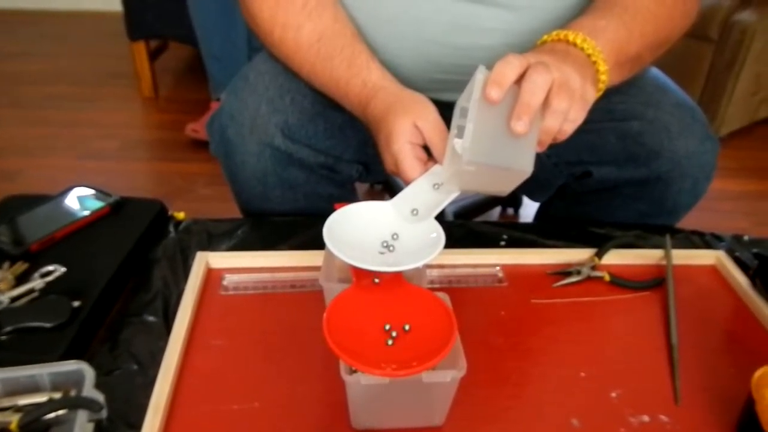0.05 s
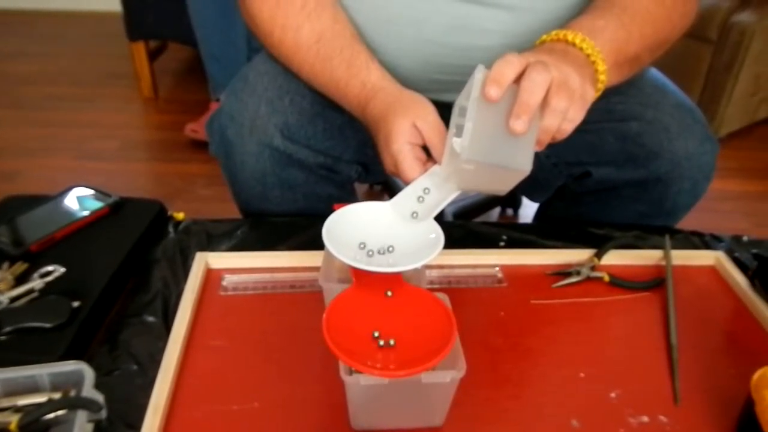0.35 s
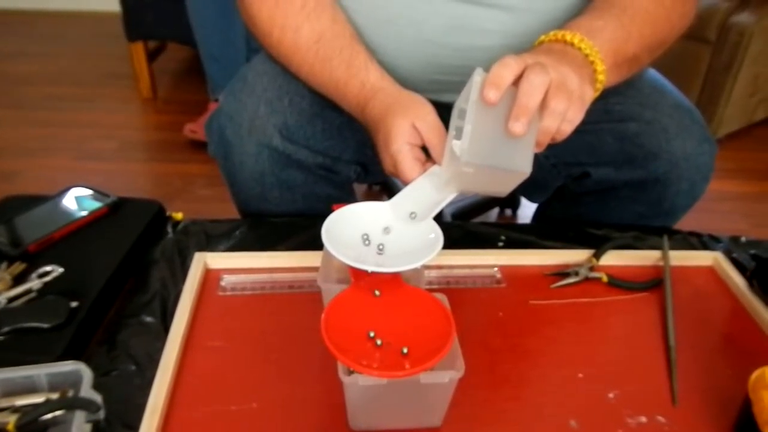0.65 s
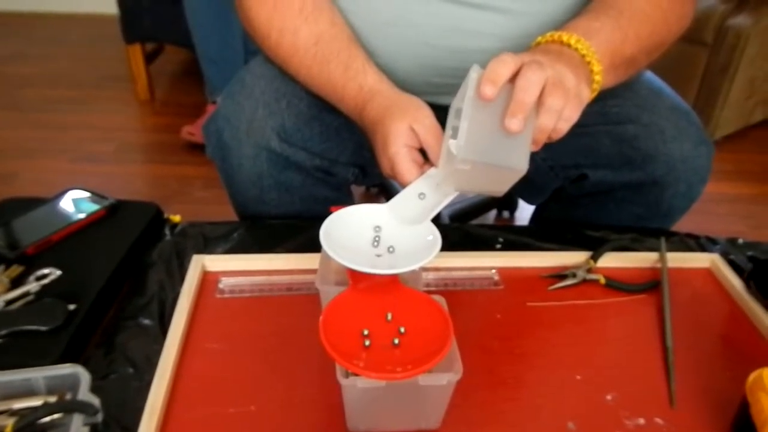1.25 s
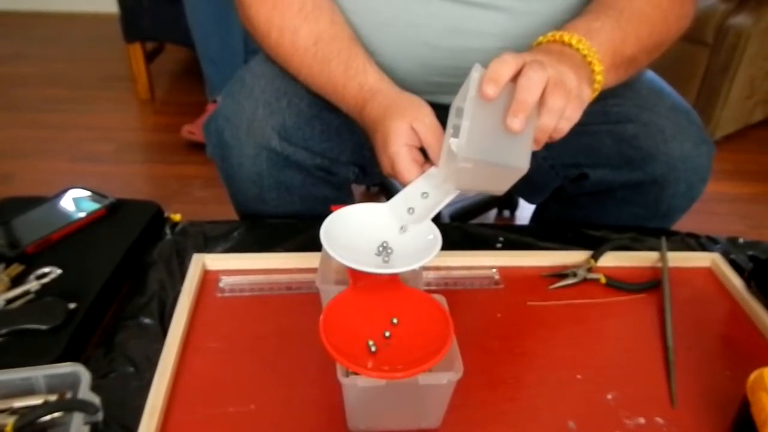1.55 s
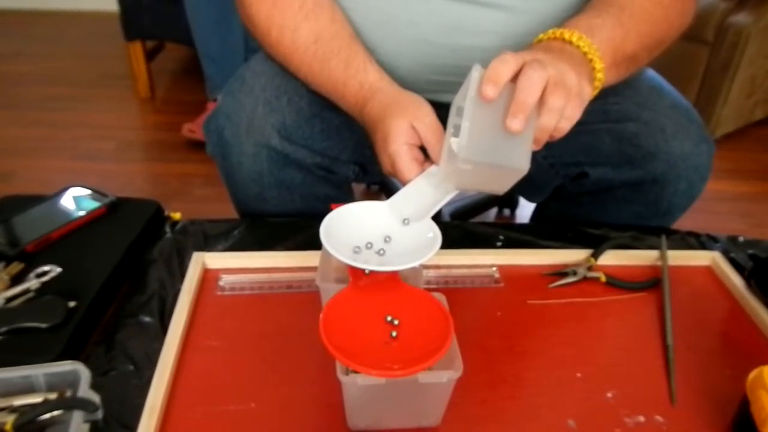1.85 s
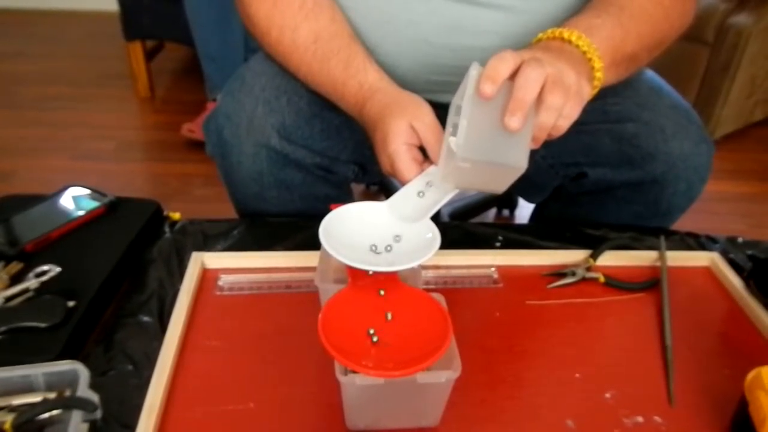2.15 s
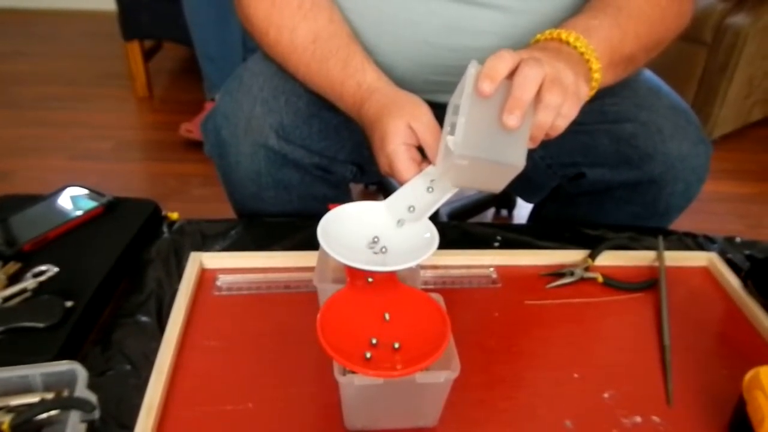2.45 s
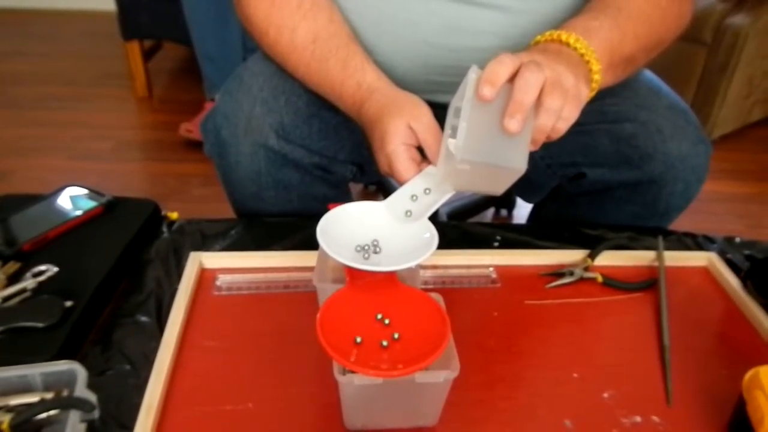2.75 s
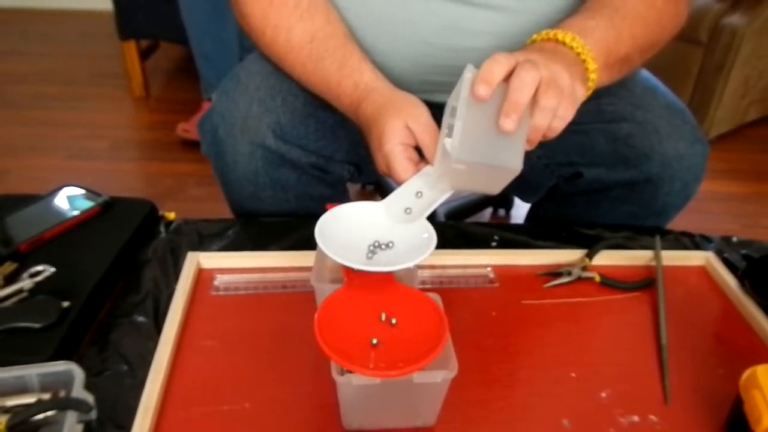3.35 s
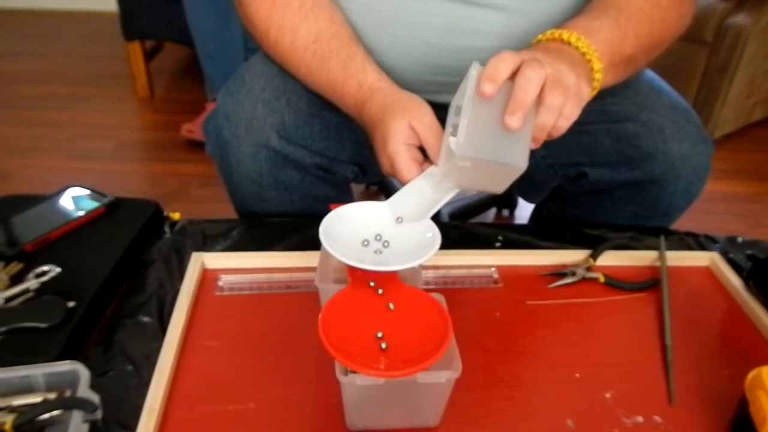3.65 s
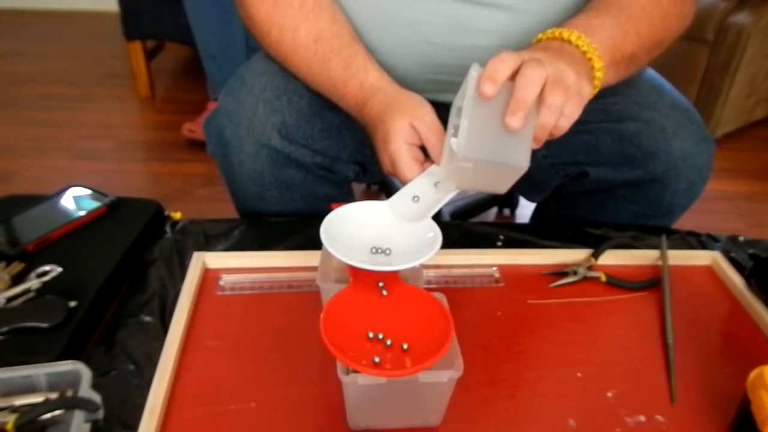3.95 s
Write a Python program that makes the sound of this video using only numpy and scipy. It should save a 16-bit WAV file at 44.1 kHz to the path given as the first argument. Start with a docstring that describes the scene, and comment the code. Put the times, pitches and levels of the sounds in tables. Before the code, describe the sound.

Small steel balls drop into plastic dishes for the whole four seconds, making quick, uneven knocks and rattles mixed with sharp metal clicks and light hops. Soft rolling and a faint chute hiss run underneath. The clatter thins briefly around 1 second and picks up at 1.3. From about 2.5 to 2.8 seconds a ball circles a rim with a short hum. It sounds close, in a quiet room.

```python
"""Small steel balls drop into a plastic spoon rest and on into a second one, each dish lying on a box.
Every landing knocks the dish, which slaps and chatters on its box. The balls click against each other,
hop lightly, rumble in the hollow and make the dish hum as they circle its rim. Behind this, balls hiss
down a plastic chute. A near stereo microphone hears it all in a quiet living room."""
import sys
import numpy as np
from scipy import signal
from scipy.fft import rfft, irfft, next_fast_len
from scipy.io import wavfile
from scipy.ndimage import map_coordinates

SR = 44100
rng = np.random.default_rng(int(sys.argv[2]) if len(sys.argv) > 2 else 0)


def output_pcm(signal):
    """Save a mono or channel-first signal as 16-bit PCM at the path in sys.argv[1].

    Samples are clipped to [-1, 1] before scaling.
    """
    pcm = np.clip(np.atleast_2d(signal).T, -1, 1) * 32767
    wavfile.write(sys.argv[1], SR, np.round(pcm).astype(np.int16))


N = 176400
SIZE = 16384  # samples in one short sound
T = np.arange(SIZE) / SR
HZ = np.fft.rfftfreq(SIZE, 1 / SR)

# the tone of a ball rolling or skidding in a dish: f/Hz, level/dB
RUMBLE_TONE = [(150, -55), (350, -21.5), (600, -5), (850, 6), (1100, -3.5), (1600, -6.5), (1950, -11.5),
               (2240, -6.5), (2650, -13), (3600, -12.5), (6000, -20.5), (8000, -26), (13000, -24),
               (16000, -70)]


def amp(db):
    """Turn decibels into a gain."""
    return 10 ** (np.asarray(db) / 20)


def unit(x):
    """Scale a signal to an average power of 1."""
    return x / np.sqrt(np.mean(x ** 2) + 1e-20)


def along(points, hz):
    """Read between the rows of a (frequency, value) table, on a log frequency axis."""
    f, v = np.transpose(points)
    return np.interp(np.log(hz + 1), np.log(f + 1), v)


def wobble(per_s):
    """A smooth random curve through per_s points a second."""
    points = rng.standard_normal(int(N * per_s / SR) + 4)
    return map_coordinates(points, [np.arange(N) * per_s / SR])


def filtered(x, response):
    """Scale each frequency of x by response(hz)."""
    m = next_fast_len(N + SR // 2)
    return irfft(rfft(x, m) * response(np.fft.rfftfreq(m, 1 / SR)), m)[..., :N]


def low_cut(hz, edge_hz):
    """A filter that weakens everything below edge_hz."""
    return (1j * hz / (1j * hz + edge_hz)) ** 2


def causal(db):
    """A filter with these gains that never sounds before it is struck (minimum phase)."""
    cepstrum = irfft(np.log(amp(db)))
    cepstrum[1:SIZE // 2] *= 2
    cepstrum[SIZE // 2 + 1:] = 0
    return np.exp(rfft(cepstrum))


def add(track, start_s, x):
    """Mix a short sound into the track."""
    i = max(round(start_s * SR), 0)
    n = min(SIZE, N - i)
    track[:, i:i + n] += x[:, :n]


def ring(modes, detune, vary_db=2):
    """Tones that fade by 60 dB in t60 seconds, struck a little differently each time."""
    out = np.zeros(SIZE)
    for hz, db, t60 in modes:
        fade = amp(db + vary_db * rng.normal() - 60 * T / t60)
        out += fade * np.sin(2 * np.pi * hz * (1 + detune * rng.normal()) * T)
    return out


def scatter(db, t60):
    """A dying spray of tiny contacts or nearby echoes, with total energy db."""
    spray = rng.standard_normal((2, SIZE)) * amp(-60 * T / t60)
    return amp(db) * spray / np.linalg.norm(spray[0])


def patter(per_s, spread_db, size=N):
    """Tiny contacts at random moments, a few much stronger than the rest."""
    strength = amp(spread_db * np.clip(rng.standard_normal(size), -2, 2))
    return unit((rng.random(size) < per_s / SR) * strength * rng.choice([-1, 1], (2, size)))


def touch():
    """One sharp push in the stereo middle, with a brief spray after it."""
    return scatter(db=-2.5, t60=0.022) + [T == 0, np.zeros(SIZE)]


def blow(body, contacts, level_db, treble_db, treble_hz=4340):
    """Each contact sets the body sounding; harder blows have more treble."""
    x = irfft(rfft(body) * rfft(contacts))
    x /= np.sqrt(np.mean(x[0, :int(.006 * SR)] ** 2))  # the first 6 ms set the level
    hardness = causal(treble_db / (1 + (treble_hz / (HZ + 1)) ** 4))
    return amp(level_db) * irfft(rfft(x) * hardness)


def rolling(levels, response, bumps_per_s, bump_db, flutter_db):
    """Rolling balls rumble and rattle over tiny bumps, which ring the plastic."""
    drive = rng.standard_normal((2, N)) + amp(bump_db) * patter(bumps_per_s, spread_db=3)
    sound = signal.fftconvolve(drive, irfft(response)[None], axes=1)[:, :N]
    level_db = np.interp(np.arange(N) / SR, *np.transpose(levels))
    return unit(sound) * amp(level_db + flutter_db * wobble(per_s=35))


def spread(pair):
    """Turn a middle and a side signal into left and right, most alike near 1 kHz."""
    # how alike left and right are: f/Hz, likeness (1 = the same)
    likeness = [(60, 0.32), (300, 0.72), (1000, 1), (3000, 0.92), (5000, 0.77), (8000, 0.21), (15000, 0.17)]
    angle = lambda hz: np.arccos(np.clip(along(likeness, hz), -1, 1)) / 2
    mid, side = filtered(pair, lambda hz: np.array([np.cos(angle(hz)), np.sin(angle(hz))]))
    return np.array([mid + side, mid - side])


def room_noise():
    """The steady, low hush of the living room."""
    # the tone of the hush: f/Hz, level/dB
    tone = [(25, -9), (60, 18), (95, 9), (122, 26.5), (150, 14.5), (192, 23), (260, 14.5), (500, 16.5),
            (1500, 2), (5000, -40), (15000, -43)]
    return unit(filtered(rng.standard_normal((2, N)), lambda hz: amp(along(tone, hz))))


def room_echo(x):
    """A short wash of echoes, drawn afresh for each stretch of sound because the balls move about."""
    # how long the echo takes to fade by 60 dB: f/Hz, t60/s
    fade_times = [(200, 0.51), (900, 0.4), (3500, 0.44), (11000, 0.25)]
    out = np.zeros((2, N))
    for i in range(0, N, SIZE // 2):
        hz, t, noise = signal.stft(rng.standard_normal((2, SIZE)), SR, nperseg=256)
        fade = amp(-60 * t / along(fade_times, hz)[:, None])
        tail = signal.istft(noise * fade, SR, nperseg=256)[1][:, :SIZE]
        tail *= 1 - np.exp(-T / 0.0022)  # the echoes take a moment to build
        tail /= np.linalg.norm(tail[0])
        echo = signal.fftconvolve(x[None, i:i + SIZE // 2], tail, axes=1)[:, :N - i]
        out[:, i:i + echo.shape[1]] += echo
    return out


def chute_roll():
    """Balls hiss as they run down the plastic chute."""
    # how the hiss swells and fades: t/s, level/dB
    levels = [(0, -51), (.42, -50.5), (.68, -52), (.84, -69), (1.02, -62), (1.17, -44.5), (1.25, -61),
              (1.4, -64), (2.05, -50), (2.8, -46), (2.96, -53), (3.11, -52.5), (3.3, -51), (3.7, -53),
              (4, -58)]
    # the tone of the hiss: f/Hz, level/dB
    tone = [(200, -22), (800, -11), (1500, -1), (2500, -3.5), (3500, 3), (4500, -8.5), (6000, -15.5),
            (8000, -19.5), (11500, -15.5), (16000, -21)]
    return rolling(levels, causal(along(tone, HZ)), bumps_per_s=200, bump_db=1, flutter_db=7)


def dish_roll():
    """Balls rumble about in the hollow of the dishes."""
    # how the rumble swells and fades: t/s, level/dB
    levels = [(0, -34.5), (.09, -51.5), (.42, -38.5), (.68, -65), (.76, -43.5), (.95, -50), (1.04, -58.5),
              (1.27, -71.5), (1.38, -45.5), (2.4, -51), (2.66, -42), (2.82, -60), (3.14, -69.5),
              (3.22, -41), (3.6, -40.5), (3.7, -53), (4, -73)]
    return rolling(levels, causal(along(RUMBLE_TONE, HZ)), bumps_per_s=310, bump_db=5.5, flutter_db=6.5)


def rim_roll(hum_hz=904, width_hz=250):
    """A ball circles the rim and makes the dish hum."""
    # how the hum swells and fades: t/s, level/dB
    levels = [(2.515, -90), (2.525, -30.5), (2.6, -38.5), (2.69, -36), (2.87, -94)]
    resonance = 1j * HZ * width_hz / (hum_hz ** 2 - HZ ** 2 + 1j * HZ * width_hz)
    return rolling(levels, resonance ** 2, bumps_per_s=160, bump_db=-1, flutter_db=3)


def hops():
    """A ball hops on the plastic with a light tap."""
    # each hop: t/s, level/dB
    hits = [(.4586, -32), (1.156, -46), (1.168, -41), (1.1945, -42.5), (1.2941, -39), (1.5185, -35),
            (1.576, -41), (1.718, -36), (1.8524, -29.5), (2.182, -38), (2.226, -32.5), (2.7202, -32),
            (3.0378, -45), (3.4852, -35), (3.5822, -32), (3.6098, -34.5), (3.6314, -37)]
    # the tone of a tap: f/Hz, level/dB
    tone = [(300, -34), (800, -8), (1800, -8), (3600, 1), (6500, -14.5), (14000, -16)]
    out = np.zeros((2, N))
    tap = irfft(causal(along(tone, HZ)))
    for start_s, db in hits:
        add(out, start_s, blow(tap, touch(), db, treble_db=0))
    return out


def clicks(boost_db=2):
    """Steel meets steel: one very short snap and a brief ring of the plastic."""
    # each click of ball on ball: t/s, level before the boost/dB, treble/dB
    hits = [(0.0021, -23.5, 1.5), (0.1684, -39, 10), (0.318, -31.5, 5), (0.428, -25.5, 4.5), (0.53, -21, 0),
            (0.8044, -24.5, 2.5), (0.833, -31, -7), (1.2689, -26.5, 4.5), (1.39, -35, 7.5),
            (1.5556, -31.5, 7.5), (1.6897, -22.5, 1), (1.825, -22.5, -1), (1.994, -28, -8),
            (2.0292, -30, -1.5), (2.05, -29.5, -6), (2.101, -25, -13), (2.1552, -33.5, 13),
            (2.1976, -24.5, 2.5), (2.3493, -31, 4.5), (2.5494, -35.5, 12), (2.701, -28, -4),
            (2.754, -33.5, -3.5), (2.9034, -21.5, -0.5), (2.9292, -33.5, -1), (2.967, -35.5, -4),
            (3.0046, -29, 7.5), (3.0265, -36, -2), (3.1445, -30.5, -12), (3.252, -22.5, 1.5),
            (3.28, -29.5, -9.5), (3.3337, -22.5, -4.5), (3.4574, -22.5, -3), (3.553, -25, 3),
            (3.7258, -23, -0.5), (3.8463, -32.5, 3), (3.9656, -24, -0.5)]
    # the tone of the dry snap: f/Hz, level/dB
    tone = [(100, -20), (400, -23), (800, -9.5), (2000, 1), (3200, 21), (4800, 17.5), (6500, 12),
            (8500, 10.5), (11000, 9.5), (14000, 6.5)]
    # the ringing of the plastic under a click: f/Hz, level/dB, t60/s
    modes = [(794, -38, 0.034), (3103, -21, 0.0083), (4054, -7, 0.0034), (4930, -23, 0.0055)]
    out = np.zeros((2, N))
    snap = irfft(causal(along(tone, HZ)))
    for start_s, db, treble_db in hits:
        body = snap / np.abs(snap).max() + ring(modes, detune=.018)
        add(out, start_s, blow(body, touch(), db + boost_db, treble_db))
    return out


def skid(landing_db, t60=0.26):
    """A ball judders on after landing; a harder landing makes this louder, but less so than the knock."""
    judder = patter(per_s=600, spread_db=5, size=SIZE)
    sound = unit(irfft(rfft(judder) * causal(along(RUMBLE_TONE, HZ))))
    return sound * amp(0.78 * landing_db - 18.5 - 60 * T / t60)


def landings(rebound_s=0.00208, slap_treble_db=1.5, slap_hz=1830):
    """A ball pushes the dish down, the box stops it with an opposite slap, and the dish chatters."""
    # each landing: t/s, level/dB, treble/dB, slap compared with the push/dB
    hits = [(0.1096, -19, 0, -14), (0.1947, -15.5, 5, -1), (0.221, -20.5, -3.5, -17),
            (0.2997, -21.0, 3.5, -7), (0.3373, -16.5, 6, 5), (0.378, -15, 1, -9.5), (0.402, -17, -3, -9),
            (0.4697, -25.5, 1.5, -5), (0.4926, -29, 2, -8), (0.708, -15.0, 5.5, 5.5),
            (0.7541, -30, -2.5, 4), (0.8249, -25, 0, -14), (0.8864, -27, 4, 0), (0.9206, -33, 2.5, -7),
            (1.3164, -15.5, 6, 2), (1.4307, -22.0, 5, -11), (1.489, -26.5, 5, -1), (1.6028, -14.5, 4, -7.5),
            (1.7364, -19, 6.5, 9), (1.812, -22, -0.5, -14), (1.924, -13.5, 3.5, 2.5),
            (2.0717, -16, 5, -3.5), (2.1648, -22.5, 2, 4), (2.2222, -30.5, 1, -6), (2.2578, -16, 1.5, 3.5),
            (2.3941, -18.0, 6, 4.5), (2.4787, -20, 3.5, 0), (2.5174, -13, -2, -2.5),
            (2.5704, -33.5, 10, -8), (2.6267, -26.5, 8, 2), (2.6507, -24, 11, 0), (2.6749, -29, 7, 1),
            (3.1635, -17.5, 7.5, 8), (3.1721, -16.5, 1, -6.5), (3.2094, -25.5, -3, -9),
            (3.3192, -17, 7.5, 3), (3.4278, -16.5, 7, 4.5), (3.4657, -23, 2.5, -7),
            (3.5404, -23.5, 3.5, -2), (3.7457, -18.0, 4, 4.5), (3.8651, -22, 6, 8),
            (3.9427, -25.5, 6.5, -2), (3.9937, -28, 2, -7)]
    # the tone of the dish's dull knock: f/Hz, level/dB
    tone = [(60, -32.5), (330, -28.5), (430, -7.5), (560, 2.5), (800, 0), (1200, 0.5), (1800, -10.5),
            (2400, -4.5), (3000, -18), (3700, -10), (5500, -18.5), (8000, -20), (11000, -15.5),
            (14000, -25)]
    # the ringing of the dish: f/Hz, level/dB, t60/s
    modes = [(788, -52.5, 0.28), (856, -41.5, 0.51), (2264, -21, 0.042), (3114, -26, 0.027),
             (3535, -30, 0.02)]
    out = np.zeros((2, N))
    thud = irfft(causal(along(tone, HZ)))
    hard_slap = causal(slap_treble_db * HZ ** 2 / (HZ ** 2 + slap_hz ** 2))
    for start_s, db, treble_db, slap_db in hits:
        delay_s = rebound_s * (1 + .04 * rng.normal())
        slap = amp(slap_db) * hard_slap * np.exp(-2j * np.pi * HZ * delay_s)
        # tiny contacts with the box stir mainly the high tones
        chatter = rfft(scatter(db=2, t60=0.027)) * low_cut(HZ, 1430)
        contacts = chatter + [1 - slap, np.zeros_like(slap)]  # the 1 is the ball's push
        body = thud / np.abs(thud).max() + ring(modes, detune=0.014)
        add(out, start_s, blow(body, irfft(contacts), db, treble_db) + skid(db))
    return filtered(out, lambda hz: low_cut(hz, 45))  # small plastic parts give off little bass


def scene():
    """Landings, rolling, clicks and hops echo in the room, over its faint noise."""
    plastic = landings() + amp(1) * dish_roll() + amp(0.5) * chute_roll() + rim_roll()
    steel = filtered(clicks() + hops(), lambda hz: low_cut(hz, 500))
    echo = room_echo(plastic[0] + amp(-3) * steel[0])  # clicks reach the room more weakly than knocks
    return spread(plastic + steel + amp(-14) * echo + amp(-62) * room_noise())


def record(dry, peak=.7, soften_hz=15400, top_hz=16400):
    """The two microphone openings colour the treble differently; peaks are rounded, the very top is cut."""
    # how much louder the left side is: f/Hz, level/dB
    balance = [(300, -1), (700, -1.5), (1200, -1), (4000, -.5), (6400, -3.5), (7400, -4.5), (8500, 1),
               (10200, 4.5), (11800, 1.5), (15000, -4.5)]
    # how far the left side is ahead: f/Hz, phase/rad
    lead = [(1000, 0.11), (2900, 0.19), (5000, 0.17), (7000, -0.9), (7700, 2.5), (10100, 0.86),
            (11500, -1.4), (14200, 1.6)]
    sides = np.array([[.5], [-.5]])
    x = filtered(dry, lambda hz: amp(sides * along(balance, hz)) * np.exp(1j * sides * along(lead, hz)))
    x = x / (1 + np.abs(x / peak) ** 6) ** (1 / 6)
    return filtered(x, lambda hz: 1 / (1 + (hz / top_hz) ** 120) / np.sqrt(1 + (hz / soften_hz) ** 30))


dry = scene()
out = record(dry)
output_pcm(out)
```